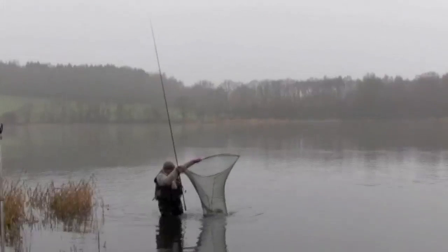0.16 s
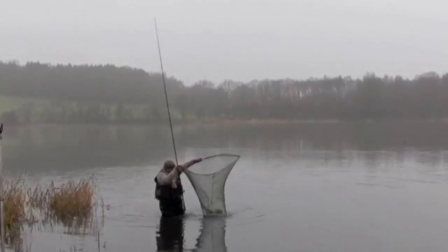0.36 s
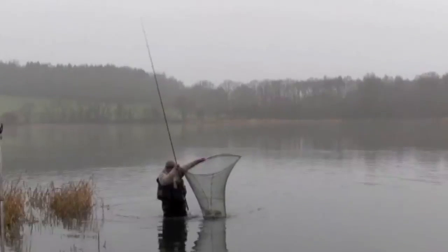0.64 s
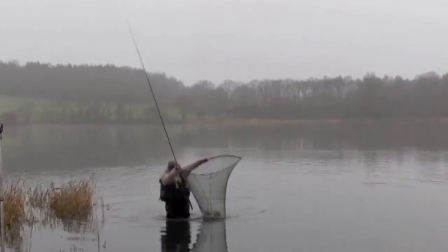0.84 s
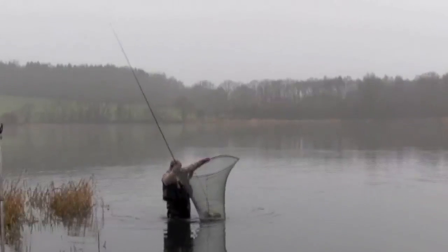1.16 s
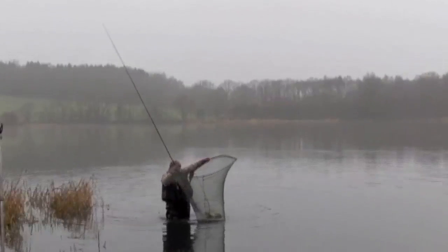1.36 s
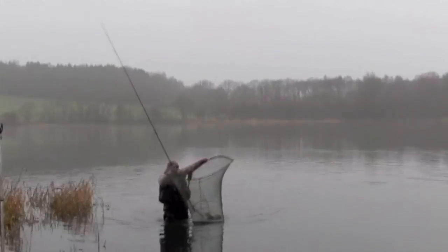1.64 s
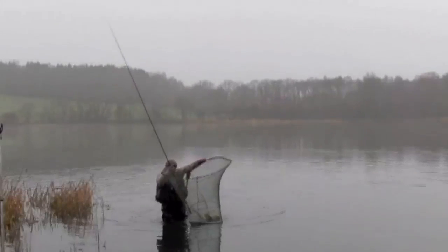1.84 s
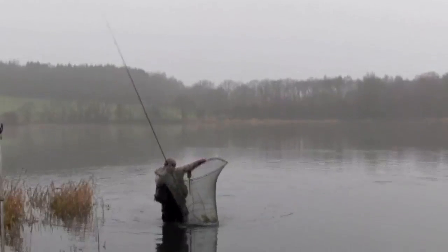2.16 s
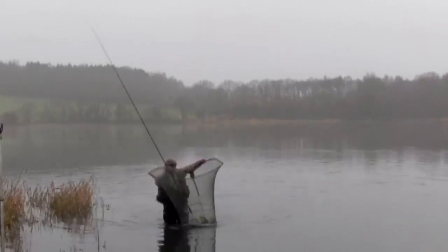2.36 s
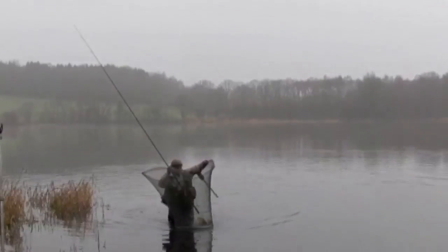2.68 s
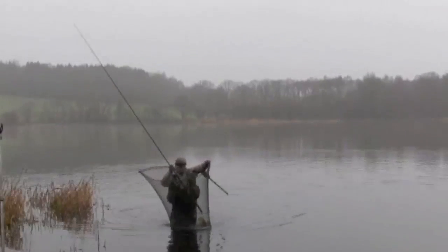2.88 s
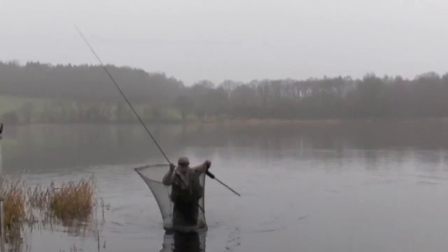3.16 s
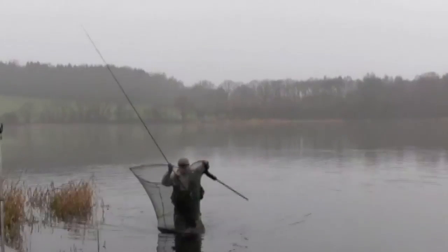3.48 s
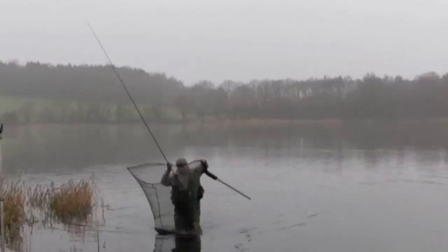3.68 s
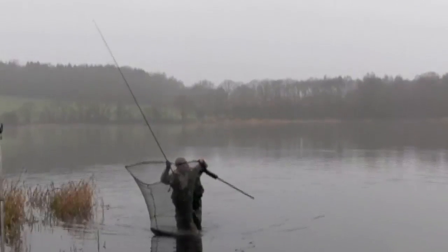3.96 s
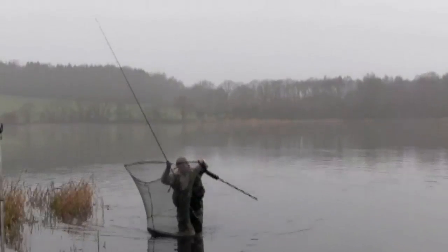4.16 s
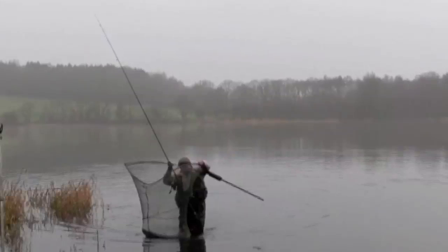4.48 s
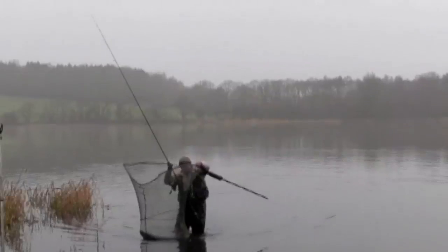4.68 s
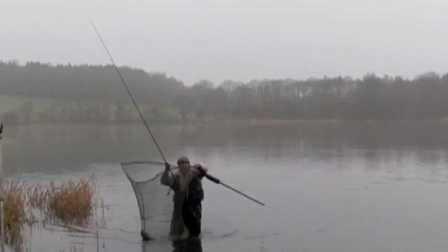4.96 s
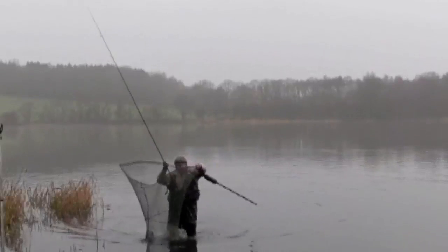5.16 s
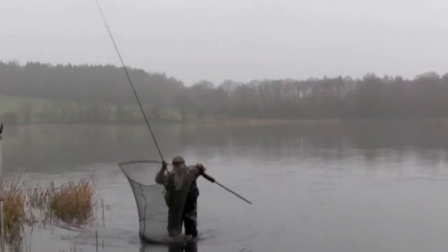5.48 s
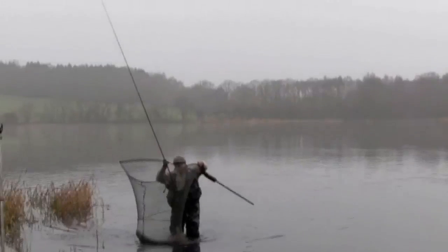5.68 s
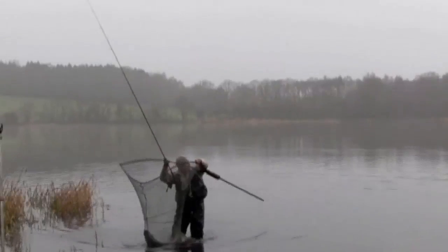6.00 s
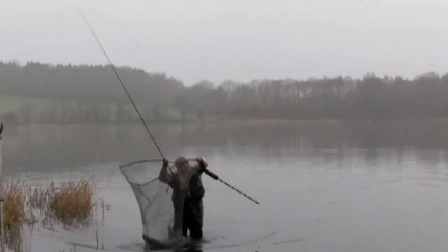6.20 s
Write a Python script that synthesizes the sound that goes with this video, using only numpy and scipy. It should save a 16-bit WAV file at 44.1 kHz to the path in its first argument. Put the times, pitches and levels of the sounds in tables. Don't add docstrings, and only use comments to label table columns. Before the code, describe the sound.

Faint water movement swells and subsides with each wading step, dotted with plinking bubbles and dry ticks close to the microphone. Distant geese, a rasping crow and a passing engine sit behind it over low traffic rumble. The last stretch is much livelier: a sudden net splash, fizzing droplets, glugging air pockets and a second splash. Hissy, wide camera sound with slightly grainy treble and a thin high whine.

```python
import sys
import numpy as np
from scipy import signal
from scipy.fft import rfft, irfft, next_fast_len
from scipy.io import wavfile
from scipy.ndimage import uniform_filter1d, minimum_filter1d, map_coordinates

SR = 44100
rng = np.random.default_rng(int(sys.argv[2]) if len(sys.argv) > 2 else 0)


def master(y):
    cut = np.clip(np.atleast_2d(y).T, -1, 1)
    pcm = np.round(cut * 32767)
    wavfile.write(sys.argv[1], SR, pcm.astype(np.int16))


def volts(x):
    e = np.asarray(x, float) / 20
    return 10 ** e


N = 279329
T = np.arange(N) / SR

# start in seconds, peak in dB, pitch in Hz, life in
BUBBLES = [(0.039, -40.5, 870, 19), (0.712, -34, 769, 29), (0.724, -32, 790, 3.8),
           (1.178, -39, 1650, 36), (1.252, -45, 737, 39), (1.723, -39, 430, 6.5),
           (1.766, -36.5, 640, 6.3), (2.02, -38, 1700, 8.3), (2.115, -36.5, 1240, 34),
           (2.415, -41.5, 1440, 19), (2.52, -40, 1070, 13), (2.943, -40, 1155, 23),
           (3.167, -33, 910, 27), (3.215, -40.5, 1073, 40), (3.246, -32.5, 1096, 16),
           (3.336, -50, 1250, 12), (3.405, -45.5, 2150, 15), (3.524, -34, 1120, 1.1),
           (3.773, -48, 3650, 13), (3.775, -42, 1400, 7), (3.794, -40, 1300, 6),
           (3.838, -43, 3240, 4.9), (3.874, -36, 404, 3.7), (3.953, -38, 1870, 18),
           (4.043, -49, 1490, 6), (3.984, -52, 796, 9.2), (4.076, -43, 1300, 11),
           (4.145, -35, 1210, 3.5), (4.174, -39, 1520, 8.5), (4.5, -38.5, 1580, 4.7),
           (4.881, -41, 1440, 9.3), (4.907, -31, 605, 5), (4.998, -27.5, 457, 2.1),
           (5.058, -48, 975, 7.1), (5.093, -23, 1135, 8.8), (5.124, -25, 790, 9), (5.157, -31, 497, 6),
               (5.165, -22.5, 548, 7.3), (5.187, -22, 497, 6.7), (5.192, -25.5, 1285, 12),
               (5.255, -27.5, 1290, 11), (5.273, -23, 1100, 6.8), (5.3, -33, 690, 15),
               (5.472, -32.5, 662, 9.2), (5.74, -36, 790, 14), (5.846, -30.5, 1006, 12),
               (5.994, -41, 1055, 50), (6.046, -37.5, 767, 9.5), (6.124, -55, 915, 9.2),
               (6.15, -40, 1067, 30), (6.168, -30, 790, 16), (6.244, -38.5, 1460, 14),
               (6.302, -38, 641, 21)]
# start in seconds, peak in dB, pitch in Hz, life in cycles.
GULPS = [
    (5.127, -32, 394, 7.3),
    (5.279, -37.5, 351, 27),
    (5.533, -29, 227, 2.9),
    (5.716, -29.5, 374, 3.6),
    (5.748, -26, 387, 3.8),
    (6.105, -34, 354, 3.2),
    (6.176, -30.5, 235, 6.2),
]
# start in seconds, peak in dB, pitch in Hz, life in cycles.
SPATTER = [(0.108, -35.5, 1400, 9.3), (.137, -43, 3500, 5.8), (1.106, -42, 1630, 7.6),
           (1.318, -35, 2070, 3.8), (2.018, -30, 2020, 1.1), (2.064, -41, 3500, 5.2),
           (2.125, -40.5, 2200, 5.4), (2.147, -41, 2500, 7.6), (2.165, -43, 3160, 10),
           (2.175, -46, 3500, 11), (3.215, -44, 2430, 5.9), (3.287, -44.5, 3000, 20),
           (3.953, -48, 3220, 7.5), (4.005, -38, 2300, 6), (4.12, -37, 2120, 1.8), (4.18, -54, 2400, 14),
           (5.057, -22, 1590, 1.1), (5.077, -28, 1590, 0.97), (5.081, -33, 3200, 11),
           (5.095, -35, 3840, 12), (5.127, -30, 3500, 6), (5.157, -31, 3260, 5.3), (5.18, -31, 3260, 5.2),
           (5.237, -33.5, 3770, 5.3), (5.252, -32.5, 3660, 5), (5.299, -33, 3860, 8.8),
           (5.312, -33.5, 2600, 1.5), (5.339, -38, 3360, 8.8), (5.433, -33.5, 3200, 3.9),
           (5.477, -27.5, 2130, 2.6), (5.188, -37, 1310, 2.2), (5.714, -33, 890, 2.8),
           (5.943, -35, 2210, 2.5), (6.151, -31, 1040, 7), (6.169, -27.5, 840, 7.9), (1.722, -36, 800, 2.7),
           (3.336, -42.5, 1200, 7.6), (3.525, -47, 1520, 2.2), (3.953, -44, 1880, 5.8),
           (4.059, -40, 553, 2.3), (6.071, -46, 2300, 13), (6.293, -35, 3340, 4.8)]
# start in seconds, peak in dB, pitch in Hz, life in
MORE_BUBBLES = [(0.698, -36, 1640, 11), (0.805, -38, 1600, 12), (1.176, -35, 1170, 6.1), (1.805, -40, 1090, 8.4),
                (3.18, -35, 1290, 8), (3.953, -51, 3230, 23), (3.995, -41, 1350, 5.9), (4.061, -47, 560, 3.7),
                (4.803, -36, 1320, 8), (5.057, -35, 2450, 15), (5.08, -31, 3360, 16), (5.084, -27, 417, 3.7),
                (5.092, -38, 3840, 26), (5.095, -27.5, 2220, 13), (5.097, -29, 465, 4.6), (5.102, -32, 2350, 19),
                (5.114, -25, 900, 6.4), (5.117, -34, 2150, 9.2), (5.12, -31, 1590, 16), (5.238, -36, 1220, 9.4),
                (5.243, -33, 660, 4.8), (5.252, -38, 3550, 25), (5.252, -30, 2270, 14), (5.27, -36, 1870, 10),
                (5.284, -38, 2310, 10), (5.289, -31, 1850, 8.8), (5.297, -42, 3700, 20), (5.3, -31, 1146, 21),
                (5.307, -25, 1160, 7), (5.309, -42.5, 2580, 25), (5.311, -35.5, 3940, 19), (5.31, -40, 3180, 23),
                (5.32, -42, 1160, 9.1), (5.367, -36, 1610, 12), (5.386, -46, 970, 6), (5.466, -35, 980, 6),
                (5.475, -36, 1210, 7), (5.565, -38, 1170, 11), (6.047, -36.5, 2240, 16), (6.135, -42, 3190, 19),
                (6.135, -32, 1210, 7), (6.142, -39.5, 3530, 21), (6.18, -27, 843, 11), (6.249, -27, 1480, 9),
                (6.29, -43, 3940, 28), (6.291, -32.5, 3060, 18), (6.305, -35, 1650, 9.2), (6.317, -26, 1010, 5)]
# start in seconds, peak in dB, pitch in Hz, life in cycles,
# pitch rise as a share.
CHIRPS = [
    (0.738, -36.5, 927, 23, 0.2),
    (4.8, -35.5, 2300, 15, 0.016),
]
# start in seconds, length in seconds, peak in dB, first pitch in Hz,
# last pitch in Hz.
PLINKS = [(.004, 0.017, -55, 1405, 1790), (0.085, 0.016, -51, 1760, 1670), (0.125, 0.017, -51, 1650, 1700),
          (1.161, 0.017, -52.5, 1090, 1350), (1.182, 0.015, -50.5, 1500, 2300),
          (1.962, 0.017, -50, 1076, 1100), (2.038, 0.013, -45.5, 1250, 1900),
          (2.046, 0.015, -46, 1430, 1000), (3.084, 0.022, -50.5, 866, 1600),
          (3.117, 0.017, -53, 1700, 2300), (3.165, 0.011, -51, 1365, 1900), (3.232, 0.012, -56, 1790, 2470),
          (3.263, 0.012, -57, 1520, 2000), (3.964, 0.008, -41.5, 2220, 1460),
          (3.984, 0.019, -49.5, 892, 1700), (4.058, 0.041, -45, 520, 693),
          (5.102, 0.017, -45.5, 1940, 2300), (5.133, 0.009, -41, 1850, 2240),
          (5.212, 0.0084, -37, 1010, 1420), (5.216, 0.014, -42, 1700, 1920),
          (5.363, 0.0076, -38.5, 885, 960), (5.377, 0.011, -46.5, 940, 1016),
          (5.435, 0.021, -50.5, 1060, 1530), (5.616, 0.0074, -42.5, 980, 795),
          (5.713, 0.019, -43.5, 997, 2630), (5.726, 0.012, -42.5, 1350, 1510),
          (5.734, 0.012, -53.5, 1530, 2480), (5.815, 0.0093, -45, 1286, 2300),
          (5.854, 0.021, -51, 1416, 2600), (5.914, 0.0095, -57, 2130, 2560),
          (5.944, 0.0064, -41.5, 2070, 1700), (5.971, 0.011, -50.5, 1910, 2600),
          (6.04, 0.037, -47, 1976, 1473)]
# start in seconds, hold in seconds, slop level in dB.
STRIDES = [
    (0.334, 0.066, -55.5),
    (0.638, 0.13, -51.5),
    (1.147, 0.2, -52.5),
    (1.792, 0.023, -64.5),
    (1.985, 0.2, -51.5),
    (2.514, 0.018, -60.5),
    (3.129, 0.14, -48.5),
    (3.969, 0.16, -49),
    (4.548, 0.031, -62.5),
    (4.907, 0.18, -50),
]
# start in seconds, hold in seconds, slop level in dB, spray level in dB.
SPLASHES = [
    (5.056, 0.03, -41.5, -49),
    (5.077, 0.14, -41, -49.5),
    (5.257, 0.065, -48.5, -49),
    (5.388, 0.095, -48.5, -63),
    (5.71, 0.039, -47.5, -68.5),
    (5.846, 0.008, -54, -61),
    (5.928, 0.0081, -95, -59.5),
    (6.048, 0.025, -49.5, -53.5),
    (6.112, 0.075, -45, -53),
    (6.273, 0.068, -48, -58.5),
]
# start in seconds, hold in seconds, level in dB.
MIST = [
    (5.081, 0.36, -61),
    (5.904, 0.0068, -66.5),
    (6.062, 0.18, -60),
    (6.277, 0.14, -74.5),
]
# frequency in Hz, density in dB per Hz.
SLOP_COLOUR = [(150, -77), (330, -7.5), (550, -4.5), (800, -0.5), (1200, 0.5), (1700, -4.5), (2500, -7.5),
               (3300, -11.5), (5000, -62.5)]
# frequency in Hz, density in dB per Hz.
SPRAY_COLOUR = [(1500, 5), (2400, -1.5), (3600, -4), (4600, -9.5), (6000, -14.5), (8500, -18), (12000, -57)]
# frequency in Hz, density in dB per Hz.
MIST_COLOUR = [(7000, -35), (9000, -13), (9700, 0), (11400, -1), (12600, -8), (14500, -17), (15500, -30)]
# frequency in Hz, side over mid in dB, side phase in radians,
# scattered share.
PORTS = [(210, -16.5, 0.5, 0.19), (790, -12, 0, 0.84), (1210, 0.5, -1.5, .3), (1700, -1, -2.5, 0.45),
         (2300, -4, -3.5, 0.62), (3500, 4, -4.5, 0.43), (4200, 3, -3, 0.54), (7300, 6.5, -4, 0.46)]
# start in seconds, peak in dB, pitch in Hz, life in cycles.
DROPS = [(0.303, -39, 3850, 2.4), (0.575, -35, 3230, 2.6), (0.589, -51, 3280, 9.1),
         (0.599, -35.5, 3350, 1.7), (0.789, -43.5, 3500, 3.7), (.88, -45, 3500, 4),
         (1.047, -45.5, 3500, 13), (1.124, -34, 1640, 3.1), (1.18, -39, 3500, 4.8), (1.319, -40.5, 3500, 5),
         (1.365, -41, 2940, 7), (2.172, -47, 3500, 4.7), (2.994, -30.5, 2830, 2.2), (3.955, -35, 2280, 4.1),
         (4.258, -44.5, 3670, 7.3), (4.442, -46.5, 3280, 12), (4.889, -42.5, 3500, 8.2),
         (4.907, -30.5, 3250, 1.8), (5.476, -38, 4940, 0.63), (5.577, -38, 3500, 5.3)]
# start in seconds, length in seconds, base pitch in Hz (each honk sounds about a tenth
# above it), level in dB.
NEAR_HONKS = [
    (.465, .13, 822, -52),
    (.632, .08, 830, -53),
    (.765, .085, 830, -53),
]
# multiple of the pitch, level in dB.
NEAR_PARTIALS = [(1, -9), (2, 0), (3, -22)]
# start in seconds, length in seconds, base pitch in Hz (each honk sounds about a tenth
# above it), level in dB.
FAR_HONKS = [
    (.68, .21, 328, -55),
]
# multiple of the pitch, level in dB.
FAR_PARTIALS = [(4, 0), (5, -9), (7, -2), (8, -10), (9, -11)]
# start in seconds, length in seconds, level in dB.
CAWS = [
    (1.014, 0.43, -52.5),
    (1.855, 0.32, -59),
]
# centre in Hz, width in Hz, level in dB.
THROAT = [(1290, 880, -2), (1640, 37, 21.5), (1980, 170, 8)]
# time in seconds, firing rate in Hz, level in dB, overtones in dB.
ENGINES = [
    [(0, 138, -46, -14), (.3, 143, -43.5, -17), (1, 154, -44, -16), (2, 169, -45.5, -11),
     (2.4, 175, -51, -7), (2.8, 180, -58, -6)],
    [(4.7, 144, -65, -14), (4.9, 144, -51, -14), (5.7, 143, -51, -14), (6.33, 141, -51, -14)],
    [(3.5, 170, -64, -14), (3.8, 170, -57, -14), (5.7, 169, -57, -14)],
]
# multiple of the firing rate, level in dB, share of the overtone level (0-1).
ENGINE_PARTIALS = [(1, 1, 0), (2, 0, 1), (3, -20, 0)]
# frequency in Hz, density in dB per Hz.
RUMBLE_COLOUR = [(12, -15), (25, -8), (45, 1.5), (82, -0.5), (97, -7), (206, -15.5), (242, -18.5),
                 (400, -19.5), (520, -52.5), (880, -120)]
# frequency in Hz, side over mid in dB.
RUMBLE_WIDTH = [(20, -10), (80, -21), (200, -8), (400, -6.5)]
# frequency in Hz, density in dB per Hz.
SHORE_MID = [(100, 12.5), (250, 6.5), (550, 5.5), (850, -0.5), (1300, -9), (1900, -18), (2600, -68.5),
             (4000, -29.5), (7000, -34)]
# frequency in Hz, density in dB per Hz.
SHORE_SIDE = [(100, -36), (375, 2.5), (800, 8.5), (1300, -7.5), (1900, -3.5), (2500, -6), (3500, -21),
              (5000, -42)]
# frequency in Hz, density in dB per Hz.
HISS_COLOUR = [(1500, -2), (3500, 1), (5500, .7), (7000, -.2), (9000, .6), (10300, 1.2), (12000, 1.3),
               (14000, .2), (15000, -1), (15450, -4), (15620, -13)]
# frequency in Hz, level in dB.
BUZZ_COLOUR = [(4000, -28), (7500, -15), (10000, -18), (14500, -15), (15200, -9), (15300, -7), (15390, -13),
               (15480, -2), (15570, -7), (15660, -20), (15750, -3), (15800, -20)]
# frequency in Hz, mid over side in dB.
BUZZ_BALANCE = [(4000, -12.5), (14000, 2), (15300, 5)]
# centre in Hz, width in Hz, gain left at the centre.
NOTCHES = [(2855, 520, .07), (4995, 190, .16)]
# frequency in Hz, level over the side in dB.
MID_FLOOR = [(300, -20), (1000, -15), (2000, -9.5), (3000, -5), (4600, -6), (5600, -5), (6800, -3),
             (8000, -1.5), (10000, 4), (12000, 4), (14000, 3.5), (14900, 2.5), (15250, -4)]
# frequency in Hz, level over the side in dB.
SIDE_FLOOR = [(300, -25.5), (1000, -18), (2600, -4), (4000, -6.5), (9000, -9.5), (14000, -10.5),
              (15500, -4)]
# start in seconds, end in seconds,
# top frequency in Hz, fineness in dB.
FINE_SPELLS = [(0, 1.8, 16000, -.3), (1.8, 3.54, 16000, -1), (3.54, 5.03, 16000, 2.6),
               (5.05, 5.15, 16000, -1), (5.15, 5.55, 16000, 1.5), (5.15, 5.46, 8500, -2),
               (5.32, 5.46, 8000, -4.5), (5.55, 6.4, 16000, -.6)]
# frequency in Hz, share of its lines.
FEWEST_SHARE = [(7500, .18), (9500, .06)]
BAND_EDGES = np.r_[0:40:4, 40:96:8, 96:144:12, 144:176:16, 176:216:20, 216:264:24, 264:320:28, 320:1024:32]


def unit(x):
    return x / np.sqrt(np.mean(x ** 2) + 1e-20)


def along(points, hz):
    f, *cols = np.transpose(points)
    return np.squeeze([np.interp(np.log(hz + 1), np.log(f + 1), c) for c in cols])


def curves(rows):
    s, *cols = np.transpose(rows)
    return [np.interp(T, s, c) for c in cols]


def wobble(rate):
    return map_coordinates(rng.standard_normal(int(N * rate / SR) + 4), [T * rate])


def filtered(x, response):
    m = next_fast_len(N + 8192)
    return irfft(rfft(x, m) * response(np.fft.rfftfreq(m, 1 / SR)), m)[..., :N]


def coloured(x, colour):
    return unit(filtered(x, lambda hz: volts(along(colour, hz))))


def noise(colour):
    return coloured(rng.standard_normal(N), colour)


def resonance(f, centre, width):
    return 1j * f * width / (centre * centre - f * f + 1j * f * width)


def place(s, wave):
    at = np.round(s * SR).astype(int) + np.arange(wave.shape[1])
    return np.bincount(at.ravel(), wave.ravel(), N + wave.shape[1])[:N]


def water():
    slopping, spraying = stirring()
    low = froth(count=5000, centre_hz=1006, spread=1.115, cycles=5.27, size=600)
    slop = coloured(low + volts(2.5) * rng.standard_normal(N), SLOP_COLOUR)
    fine = froth(count=12000, centre_hz=3500, spread=0.56, cycles=2.4, size=100)
    spray = coloured(fine + volts(1.5) * rng.standard_normal(N), SPRAY_COLOUR)
    body = slopping * volts(-4.5 + 1.5 * wobble(40)) * slop
    body += spraying * volts(6.0 + 1.5 * wobble(50)) * spray
    body += slopping * volts(-14) * trickle()
    return from_water(body + mist() + plinks() + single_bubbles())


def stirring():
    strides = surges(*np.transpose(STRIDES), rise=0.43, fall=0.11)
    s, hold, slop_db, spray_db = np.transpose(SPLASHES)

    def splash(db):
        burst = surges(s, hold, db, rise=0.004, fall=0.029)
        wash = surges(s, hold, db - 8, rise=0.004, fall=0.41)
        return burst + wash

    slopping = volts(-68) + strides + splash(slop_db - 4.5)
    spraying = volts(-91) + volts(-25.5) * strides + splash(spray_db - 6.0)
    return slopping, spraying


def surges(s, hold, db, rise, fall):
    t = T[::32]
    before = np.maximum(s[:, None] - t, 0)
    after = np.maximum(t - (s + hold)[:, None], 0)
    gain = volts(db[:, None] - 10 * before / rise - 10 * after / fall)
    return np.interp(T, t, gain.sum(axis=0))


def bubbles(s, db, hz, cycles, rise, size):
    t = np.arange(size) / SR
    s, db, hz, cycles, rise = (np.broadcast_to(v, np.shape(s))[:, None] for v in (s, db, hz, cycles, rise))
    u = t * hz / np.maximum(cycles, .5)
    swell = (1 - np.exp(-20 * u)) * np.exp(-2.2 * u ** 1.3)
    ring = np.sin(2 * np.pi * hz * t * (1 + rise * u / 2))
    return place(s, volts(db + 4.5) * swell * ring)


def froth(count, centre_hz, spread, cycles, size):
    when, pitch, big = rng.random((count, 3)).T
    hz = centre_hz * np.exp(spread * (2 * pitch - 1))
    return unit(bubbles(when * N / SR, -2.5 * np.log(big + 0.02), hz, cycles, 0.23, size))


def trickle():
    when, pitch, big, climb = rng.random((500, 4)).T
    hz = 1200 * np.exp(.5 * (2 * pitch - 1))
    db = -2.5 * np.log(big + 0.009)
    return unit(bubbles(when * N / SR, db, hz, 17, 0.092 + .35 * climb, size=1200))


def mist():
    gain = surges(*np.transpose(MIST), rise=0.012, fall=0.19)
    return gain * volts(0.22 * wobble(64)) * noise(MIST_COLOUR)


def single_bubbles():
    more_bubbles = [(s, db - 1.5, *shape) for s, db, *shape in MORE_BUBBLES]
    submerged = [*BUBBLES, *GULPS, *SPATTER, *more_bubbles]
    s, db, *shape = np.transpose([(*row, 0.041) for row in submerged] + [*CHIRPS])
    return bubbles(s - .001, db - 7.5, *shape, size=2500)


def plinks():
    s, length, db, first_hz, last_hz = np.transpose(PLINKS)[:, :, None]
    u = np.clip(np.arange(2200) / SR / length, 0, 1)
    turn = 2 * np.pi * np.cumsum(first_hz * (last_hz / first_hz) ** u, axis=1) / SR
    return place(s, volts(db) * np.sin(np.pi * u ** 0.87) ** 0.38 * np.sin(turn))


def from_water(x):
    z = signal.stft(x, nperseg=256)[2]
    z = z * np.exp(2j * np.pi * rng.random(z.shape))
    scattered = volts(7.0) * signal.istft(z, nperseg=256)[1][:N]

    def direct_path(hz):
        db, phase, share = along(PORTS, hz)
        return volts(db) * np.exp(1j * phase) * np.sqrt(1 - np.clip(share, 0, 1))

    def scattered_path(hz):
        db, _, share = along(PORTS, hz)
        return volts(db) * np.sqrt(np.clip(share, 0, 1))

    return np.array([x, filtered(x, direct_path) + filtered(scattered, scattered_path)])


def drops():
    tick = bubbles(*np.transpose(DROPS), 0.0085, size=150)
    return tick * volts([[-5], [-.1]]) * [[1], [-1]]


def birds():
    return (geese() + crow()) * volts([[-8], [-.1]]) * [[1], [-1]]


def arch(s, length):
    return np.sin(np.pi * np.clip((T - s) / length, 0, 1)) ** 1.6


def geese():
    calls = np.zeros(N)
    for table, partials in ((NEAR_HONKS, NEAR_PARTIALS), (FAR_HONKS, FAR_PARTIALS)):
        for s, length, hz, db in table:
            swell = arch(s, length)
            turn = 2 * np.pi * hz * np.cumsum(1.1 + 0.011 * swell + 0.0062 * wobble(62.3)) / SR
            calls += swell * sum(volts(db + g + 1.6 * wobble(32)) * np.sin(k * turn) for k, g in partials)
    return calls


def crow():
    pulses = (1 + np.sin(2 * np.pi * np.cumsum(85 + 14 * wobble(30)) / SR)) ** 2.0

    def throat(f):
        return sum((-1) ** k * volts(db) * resonance(f, c, w) for k, (c, w, db) in enumerate(THROAT))

    rasp = unit(filtered(pulses * rng.standard_normal(N), throat))
    return rasp * sum(volts(db) * arch(s, length) for s, length, db in CAWS)


def engines():
    tones = np.zeros(N)
    for rows in ENGINES:
        hz, db, upper_db = curves(rows)
        turn = 2 * np.pi * np.cumsum(hz + 0.34 * wobble(6)) / SR
        on = (T >= rows[0][0]) & (T <= rows[-1][0])
        for k, g, follows in ENGINE_PARTIALS:
            level = db + 0.5 + g + follows * upper_db + 0.32 * wobble(1.3)
            tones += on * volts(level) * np.sin(k * turn)
    return tones * volts([[0], [-15]])


def traffic():
    side = [(hz, db + along(RUMBLE_WIDTH, hz)) for hz, db in RUMBLE_COLOUR]
    drift = volts(-41 - 1.0 * wobble(4.6))
    return drift * np.array([noise(RUMBLE_COLOUR), volts(-14.0) * noise(side)])


def far_shore():
    return volts([[-53], [-59]] + 0.65 * wobble(4.4)) * [noise(SHORE_MID), noise(SHORE_SIDE)]


def hiss():
    return volts([[-59.5], [-53.5]]) * [noise(HISS_COLOUR), noise(HISS_COLOUR)]


def buzz():
    pulses = np.zeros(N)
    pulses[300::735] = 1
    pulses[300 + 735::1470] = -1

    def sweep(hz):
        return volts(along(BUZZ_COLOUR, hz)) * np.exp(2j * np.pi * 0.0053 * (hz - 15000) ** 2 / 2000)

    side = volts(-74) * unit(filtered(pulses, sweep))
    return np.array([filtered(side, lambda hz: volts(along(BUZZ_BALANCE, hz))), side])


def whine():
    turn = 2 * np.pi * np.cumsum(15731.5 + 3 * wobble(20)) / SR
    return volts(-68 + 1.5 * wobble(8)) * np.sin(turn) * volts([[-5], [.1]])


def scene():
    background = engines() + traffic() + far_shore() + hiss() + buzz() + whine()
    mid, side = water() + drops() + birds() + background
    return np.array([mid + side, mid - side])


def rounded(z, step):
    return np.sign(z) * np.floor(np.abs(z) / step + .4) * step


def coarsened(mid, side):
    n, k, lead = np.arange(2048), np.arange(1024), 1032
    window = signal.windows.kaiser_bessel_derived(2048, 4 * np.pi)[:, None]
    basis = window * np.cos(np.pi / 1024 * np.outer(n + 512.5, k + .5)) / np.sqrt(512)
    at = 1024 * np.arange(N // 1024 + 3)[:, None] + n
    hz, t = (k + .5) * SR / 2048, (at[:, 1024] - lead) / SR
    m, s = (np.dot(np.pad(v, (lead, 4096))[at], basis).T for v in (mid, side))

    masker = uniform_filter1d(np.abs(s) + .4 * np.abs(m), size=49, axis=0)
    masker = minimum_filter1d(masker, size=3, axis=1) / .6 + 1e-12

    band = np.searchsorted(BAND_EDGES, k, side="right") - 1
    scatter_db = 1.6 * rng.standard_normal((len(BAND_EDGES), len(t)))[band]
    scatter_db = scatter_db + 1.15 * rng.standard_normal(len(t))
    for start, end, top_hz, db in FINE_SPELLS:
        treble = ((hz > 4700) & (hz < top_hz))[:, None]
        scatter_db = scatter_db - db * ((t >= start) * (t < end) * treble)

    m = rounded(m, masker * volts(along(MID_FLOOR, hz)[:, None] + scatter_db))
    survivors = np.add.reduceat(1. * (m != 0), BAND_EDGES)
    fewest = along(FEWEST_SHARE, hz[BAND_EDGES]) * np.bincount(band)
    m = m * (survivors >= fewest[:, None])[band]
    s = rounded(s, masker * volts(along(SIDE_FLOOR, hz)[:, None]))
    return [np.bincount(at.ravel(), np.dot(z.T, basis.T).ravel())[lead:lead + N] for z in (m, s)]


def low_pass(x):
    return signal.sosfilt(signal.butter(12, 15960, fs=SR, output="sos"), x)


def record(dry):
    def response(f):
        traps = np.prod([1 - (1 - left_over) * resonance(f, c, w) for c, w, left_over in NOTCHES], axis=0)
        return traps / (1 + (f / 15775) ** 500)

    left, right = filtered(dry, response)
    mid, side = coarsened((left + right) / 2, (left - right) / 2)
    return low_pass(np.array([mid + side, mid - side]))


dry = scene()
out = record(dry)
master(out)
```